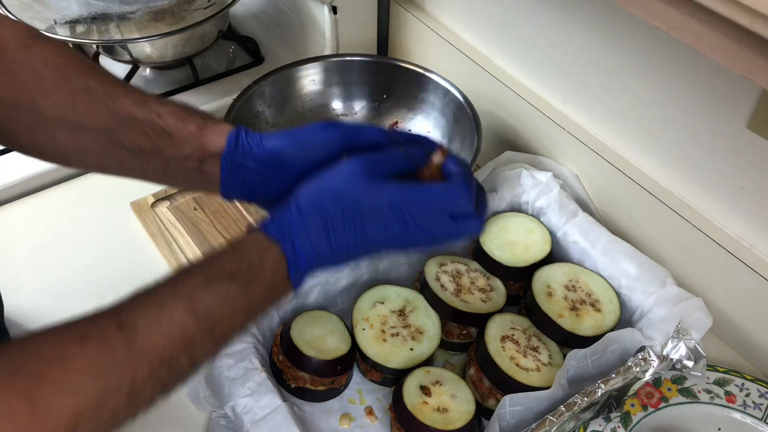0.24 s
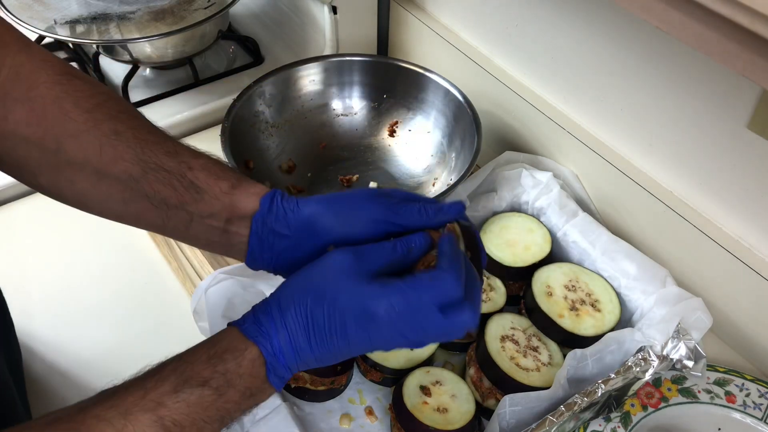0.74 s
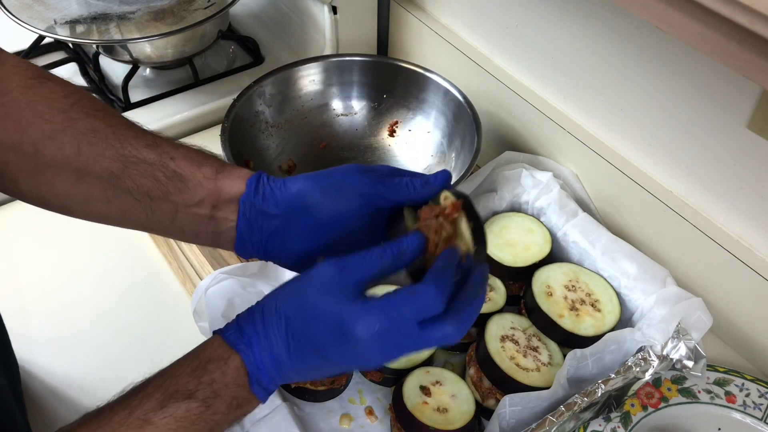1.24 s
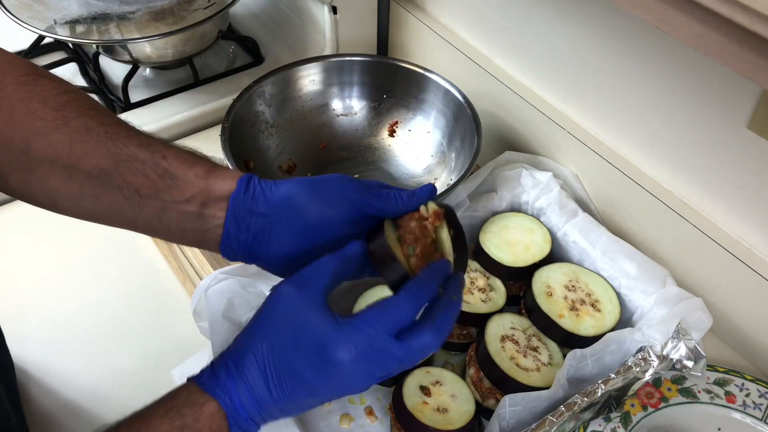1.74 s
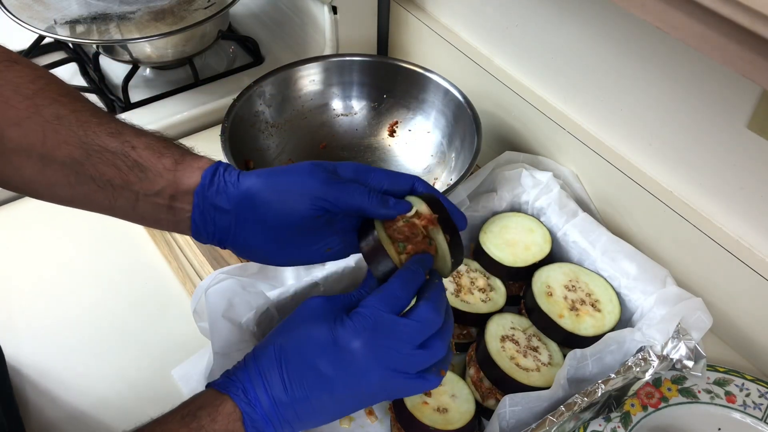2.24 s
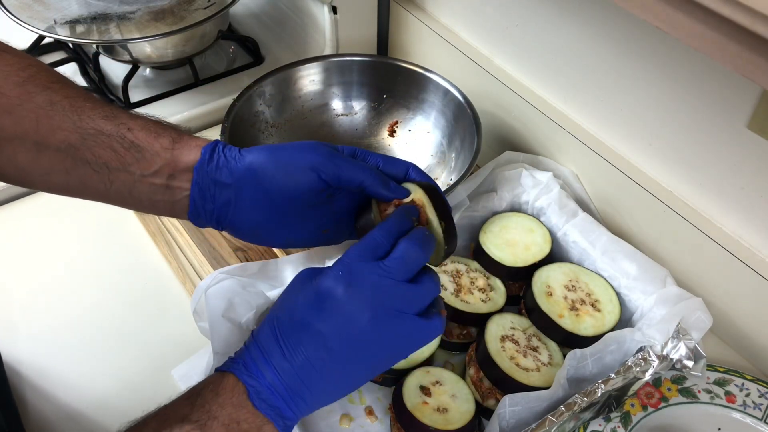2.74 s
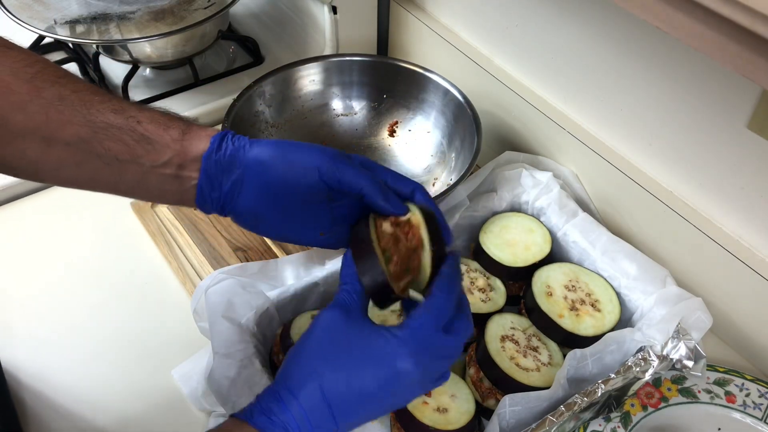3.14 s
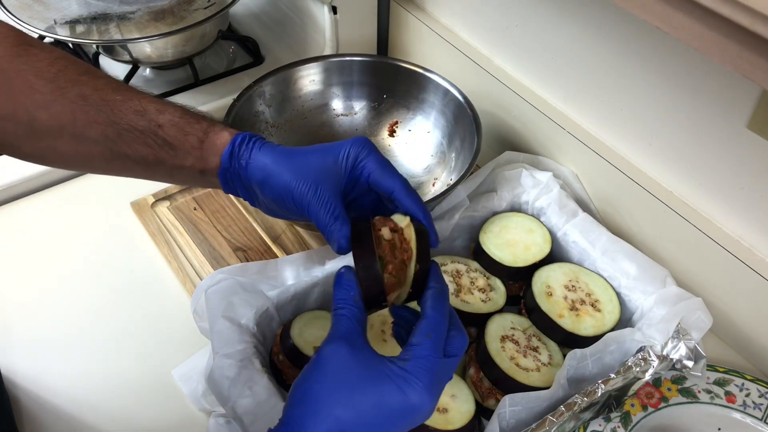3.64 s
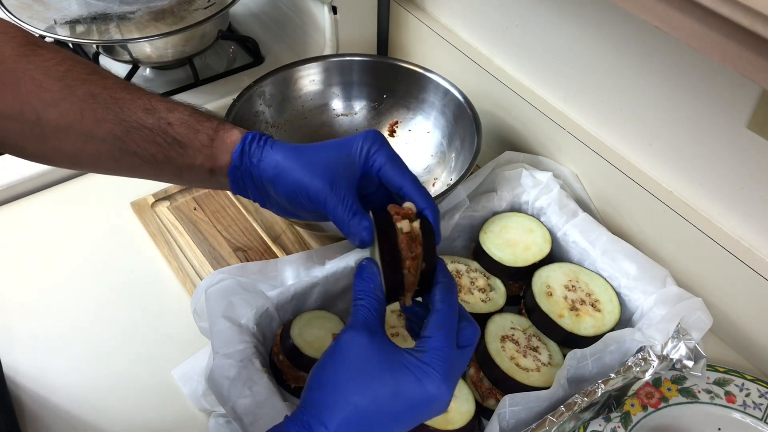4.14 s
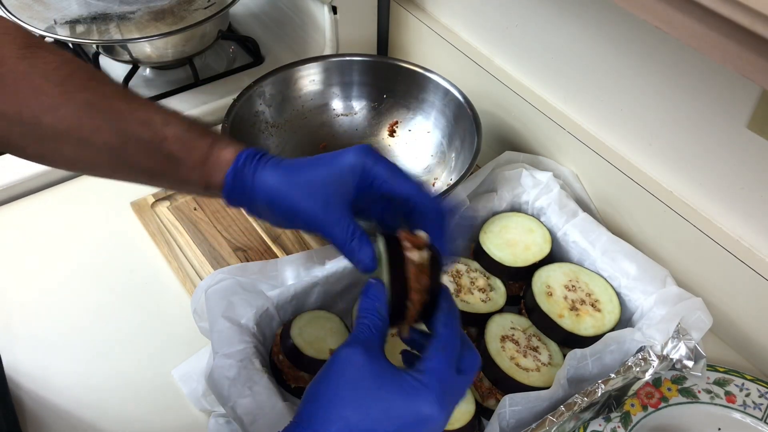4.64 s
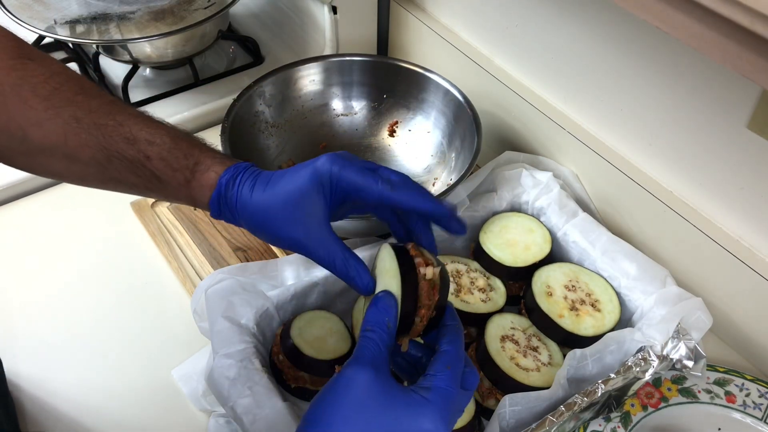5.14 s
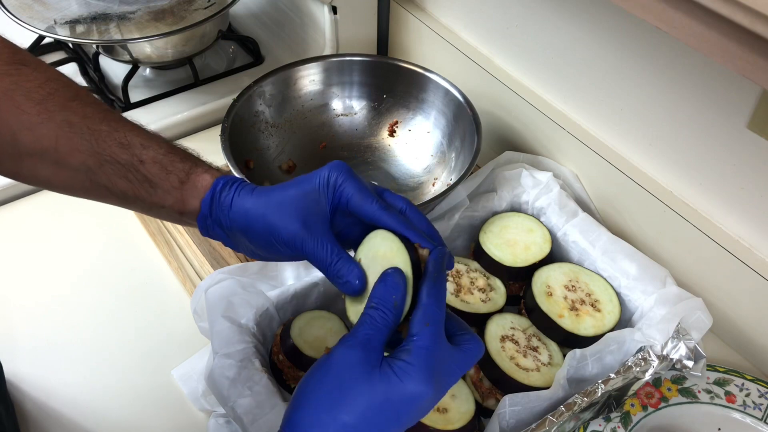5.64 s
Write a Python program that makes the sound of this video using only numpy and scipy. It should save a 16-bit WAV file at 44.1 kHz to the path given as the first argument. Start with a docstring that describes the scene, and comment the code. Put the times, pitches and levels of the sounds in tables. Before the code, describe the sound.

Faint wet crackle and glove rubs in a quiet humming kitchen, with crisp rubber snaps near one and a half and five seconds.

```python
"""A low appliance hum in a quiet, hard-walled kitchen: steady tones that waver, over rumble and hiss.
Gloved hands press meat filling between two eggplant slices. Filtered grains of noise make the
moist crackle and the rubs, short rings the wet pops, short noise bursts the rubber ticks.
Foremost, sticky gloves snap as they pull free: evenly flattened noise, shaped by resonances,
arrives direct and is answered by the walls."""
import sys
import numpy as np
from scipy import signal
from scipy.fft import rfft, irfft
from scipy.io import wavfile
from scipy.ndimage import uniform_filter1d

SR = 44100
rng = np.random.default_rng(int(sys.argv[2]) if len(sys.argv) > 2 else 0)


def dump(signal):
    """Clip the signal to [-1, 1] and save it as 16-bit WAV at the path in sys.argv[1]."""
    limited = np.clip(np.atleast_2d(signal).T, -1, 1)
    pcm = np.round(limited * 32767).astype(np.int16)
    wavfile.write(sys.argv[1], SR, pcm)


N = 260073
TIME = np.arange(N) / SR
CUTOFF_HZ = 16000   # top of the microphone's range


def from_db(db):
    """Decibels to amplitude gain."""
    return 10 ** (np.asarray(db) / 20)


def rms_one(x):
    """Scale to rms 1."""
    return x / np.sqrt(np.mean(x ** 2) + 1e-20)


def unit_energy(x):
    """Scale to the energy of a unit click."""
    return x / np.sqrt(np.sum(x ** 2))


def at_hz(points, hz):
    """Read (f/Hz, value) points on a log-frequency axis."""
    f, value = np.transpose(points)
    return np.interp(np.log(hz + 1e-3), np.log(f), value)


def hz_axis(size):
    """Frequencies of the bins of a transform."""
    return np.arange(size // 2 + 1) * SR / size


def add(track, s, sound):
    """Mix a sound in at a time in seconds."""
    start = max(round(s * SR), 0)
    track[start:start + len(sound)] += sound[:N - start]


def drift(rate_hz):
    """Slow random wander of rms 1: noise with a Gaussian low-pass."""
    lowpass = np.exp(-(hz_axis(N) / rate_hz) ** 2)
    return rms_one(irfft(rfft(rng.standard_normal(N)) * lowpass, N))


def coloured(x, spectrum):
    """Give a steady sound a spectrum; rms 1."""
    gain = from_db(at_hz(spectrum, hz_axis(N)))
    return rms_one(irfft(rfft(x) * gain, N))


def band(x, hz, octaves, order=1):
    """Band-pass around a centre."""
    low = hz * 2 ** (-octaves / 2)
    high = min(hz * 2 ** (octaves / 2), .45 * SR)
    return signal.sosfilt(signal.butter(order, [low, high], "band", fs=SR, output="sos"), x)


def causal(gain_db):
    """Minimum-phase response with the given gains: nothing sounds early."""
    cepstrum = irfft(np.log(from_db(gain_db)))
    half = len(cepstrum) // 2
    cepstrum[1:half] *= 2
    cepstrum[half + 1:] = 0
    return np.exp(rfft(cepstrum))


def bump(f, hz, width_hz, db):
    """A resonance as a gain in dB."""
    return db / (1 + (2 * (f - hz) / width_hz) ** 2)


def grains(per_s, spread_db):
    """Tiny slips of uneven size at random moments; rms 1."""
    sizes = from_db(spread_db * np.minimum(rng.exponential(1, N), 5))
    happens = rng.random(N) < per_s / SR
    return rms_one(sizes * rng.standard_normal(N) * happens)


def flutter(rise, t60, size=8192, count=3, abruptness=1.137):
    """Rubber slapping to rest: a dense train of contacts that holds all pitches evenly, then breaks off."""
    t = np.arange(size) / SR
    envelope = (1 - np.exp(-t / rise)) * from_db(-60 * np.minimum(t / t60, 2) ** abruptness)
    x = rng.standard_normal(size) * envelope
    # by turns flatten the spectrum and restore the envelope
    for _ in range(count):
        even = irfft(np.exp(1j * np.angle(rfft(x))))
        local_power = uniform_filter1d(even ** 2, size=48)
        x = even * envelope / np.sqrt(np.abs(local_power) + 1e-12)
    return unit_energy(x)


# appliance tones before waver and swell: (f/Hz, rms level/dB)
HUM_TONES = [(59.5, -69.5), (118.5, -70.5), (220, -77.5)]
# spectrum of the kitchen's rumble and hiss: (f/Hz, relative level/dB per Hz)
AIR_SPECTRUM = [(20, -60.5), (30, -39.5), (45, 1.5), (87, -1), (120, -1.5), (155, -15), (211, -5.5),
                (290, -13.5), (460, -19.5), (1000, -19.5), (2000, -23.5), (4300, -35), (10000, -37.5),
                (16000, -35.5)]
AIR_RMS_DB = -60
# the hum swells once, slowly
HUM_SWELL_AT_S, HUM_SWELL_HALF_S, HUM_SWELL_DB = 3.55, 0.51, 5.5


def background(waver=0.37):
    """Room rumble and hiss as coloured noise under sines that waver in level and phase."""
    hum = np.zeros(N)
    for hz, db in HUM_TONES:
        level = from_db(db) * (1 + waver * drift(1.7))
        phase = 2 * np.pi * hz * TIME + 2 * waver * drift(2.2)
        hum += level * np.sqrt(2) * np.sin(phase)
    swell_db = HUM_SWELL_DB * np.exp(-.5 * ((TIME - HUM_SWELL_AT_S) / HUM_SWELL_HALF_S) ** 2)
    air = from_db(AIR_RMS_DB) * coloured(rng.standard_normal(N), AIR_SPECTRUM)
    return hum * from_db(swell_db) + air


# decay of the kitchen's late tail: (f/Hz, t60/s)
KITCHEN_DECAY = [(200, 0.84), (700, 0.426), (2500, 0.303), (6000, 0.26), (10000, 0.26), (15000, 0.071)]


def kitchen_response(early_db=10.5, early_t60=0.0463, gap_s=0.0012, size=32768):
    """Quick reflections from counter and wall, then a tail that dies sooner in the treble."""
    t, out = np.arange(size) / SR, 0
    for hz in np.geomspace(140, 16000, num=14):
        tail = from_db(-60 * t / at_hz(KITCHEN_DECAY, hz))
        early = from_db(early_db - 60 * t / early_t60)
        out = out + band(rng.standard_normal(size), hz, 0.522, order=2) * (tail + early)
    response = rfft(out * (1 - np.exp(-(t / gap_s) ** 2)))
    # hard walls return all pitches about equally
    power = uniform_filter1d(np.abs(response) ** 2, size=90)
    return unit_energy(irfft(response * causal(-10 * np.log10(power + power.mean() / 20))))


def in_kitchen(x, room, room_db):
    """Direct sound at the microphone plus the room's answer."""
    return x + from_db(room_db) * signal.fftconvolve(x, room)[:len(x)]


# the fingers press the filling: (t/s at the firmest, rustle level/dB)
FINGER_PRESSES = [(0.58, -66), (1.08, -70), (1.36, -68.5), (2.4, -78.5), (3.1, -70), (3.46, -79.5),
                  (5.25, -72.5), (5.85, -70)]
PRESS_ATTACK_S, PRESS_RELAX_S = .11, 0.277   # time constants
# the gloves rustle a little even while they only hold, less as the filling settles
HOLD_DB, HOLD_FADE_DB_PER_S = -71.5, 1.2353


def effort():
    """Finger work as a gain: low while holding, swelling with each press, dying as the filling gives way."""
    power = from_db(HOLD_DB - HOLD_FADE_DB_PER_S * TIME) ** 2
    for s, db in FINGER_PRESSES:
        press = np.exp(-np.maximum((s - TIME) / PRESS_ATTACK_S, (TIME - s) / PRESS_RELAX_S))
        power = power + (from_db(db) * press) ** 2
    return np.sqrt(power)


# spectrum of the moist rustle: (f/Hz, relative level/dB per Hz)
RUSTLE_SPECTRUM = [(200, -31.5), (800, -18.5), (1500, 0.5), (3200, -.5), (6000, -1), (9300, -2),
                   (10500, -9.5), (12000, 1.5), (16000, -10)]


def kneading(work, patchy_db=2.5):
    """Fine moist crackle: coloured random grains that follow the work of the fingers."""
    crackle = coloured(grains(per_s=2800, spread_db=0.84), RUSTLE_SPECTRUM)
    return work * from_db(patchy_db * drift(22)) * crackle


def stroke(s, db, half_length):
    """A sliding finger speeds up and slows down evenly: a Gaussian gain."""
    return from_db(db) * np.exp(-.5 * ((TIME - s) / half_length) ** 2)


# glove glides over the smooth skin with a broad hiss: (t/s at the middle, rms level/dB, half length/s)
SKIN_GLIDES = [(1.873, -61, 0.0155), (2.375, -59.5, 0.011), (2.883, -61.5, 0.0184), (2.933, -61.5, 0.0103),
               (3.26, -66, 0.0256), (3.796, -68, 0.026), (4.407, -63.5, 0.0103), (4.627, -64.5, 0.0316),
               (5.229, -63.5, 0.026), (5.729, -57.5, 0.0181)]
GLIDE_HZ, GLIDE_OCTAVES = 9870, 3.26
# glove grips and nearly squeaks, always at one pitch: (t/s at the middle, rms level/dB, half length/s)
NEAR_SQUEAKS = [(0.611, -73, 0.037), (1.446, -66, 0.0236), (1.874, -62.5, 0.0121), (3.167, -70.5, 0.0167)]
SQUEAK_HZ, SQUEAK_OCTAVES = 3344, 0.242
# soft flesh drags dully: (t/s at the middle, rms level/dB, half length/s, centre f/Hz)
FLESH_DRAGS = [(0.16, -68.5, 0.0218, 1514), (1.032, -70.5, 0.025, 1196), (2.215, -67.5, 0.0228, 970),
               (2.903, -73, 0.086, 680), (3.278, -66.5, 0.0196, 517), (3.578, -71.5, 0.104, 565),
               (3.75, -63.5, 0.042, 577), (3.869, -65, 0.0323, 540), (5.848, -68, 0.033, 1320)]
DRAG_OCTAVES = 0.822


def rubs(stutter_db=1.7):
    """Glove slides on eggplant: dense slips, broad in a glide, narrow near a squeak, dull on the flesh."""
    slips = grains(per_s=16000, spread_db=3.5) * from_db(stutter_db * drift(90))
    hiss = rms_one(band(slips, GLIDE_HZ, GLIDE_OCTAVES, order=2))
    glides = sum(stroke(*row) for row in SKIN_GLIDES) * hiss
    narrow = rms_one(band(slips, SQUEAK_HZ, SQUEAK_OCTAVES, order=2))
    squeaks = sum(stroke(*row) for row in NEAR_SQUEAKS) * narrow
    drags = np.zeros(N)
    for s, db, half_length, hz in FLESH_DRAGS:
        dull = rms_one(band(slips, hz, DRAG_OCTAVES, order=2))
        drags += stroke(s, db, half_length) * dull
    return glides + squeaks + drags


# wet pops of the filling: (t/s, level/dB before trim and splat, f/Hz)
WET_POPS = [(1.4748, -46, 3300), (1.675, -43.5, 1207), (2.891, -47, 4050), (3.081, -48, 2445),
            (3.1855, -44, 3157), (3.247, -53, 2053), (3.260, -45, 1091), (3.274, -53, 960),
            (3.324, -51, 929)]
POP_CYCLES = 59.6   # each ring falls 60 dB within this many cycles


def pops(trim_db=-3.0, swell_s=0.000243, spread=0.059, splat_db=-6.0, splat_octaves=2.34,
         splat_share=0.56, count=4, size=8192):
    """Wet pockets open with a splat and ring at close, unequal pitches; the lower, the longer."""
    out, t = np.zeros(N), np.arange(size) / SR
    for s, db, hz in WET_POPS:
        t60 = POP_CYCLES / hz
        pitches = hz * (1 + spread * (np.linspace(-1, 1, count) + rng.random(count) - .5))
        ring = np.sin(2 * np.pi * np.outer(pitches, t)).sum(axis=0)
        ring = ring * (1 - np.exp(-t / swell_s)) * from_db(-60 * t / t60)
        splat = band(flutter(swell_s, splat_share * t60, size=size), hz, splat_octaves, order=2)
        pop = ring / np.abs(ring).max() + from_db(splat_db) * splat / np.abs(splat).max()
        add(out, s, from_db(db + trim_db) * pop)
    return out


# fainter ticks come by chance, as often as the fingers press hard: rate at the firmest press,
# middle level before trim, middle pitch
STRAY_TICKS_PER_S, STRAY_TICK_DB, STRAY_TICK_HZ = 24, -51.5, 9000


def stray_ticks(work, scatter_db=-5.0, scatter_octaves=.75, count=240):
    """Chance ticks (t/s, level/dB before trim, f/Hz) that crowd where the fingers work hardest."""
    when, luck, strength, pitch = rng.random((count, 4)).T
    per_s = STRAY_TICKS_PER_S * (work[(when * N).astype(int)] / work.max()) ** 2
    db = STRAY_TICK_DB + scatter_db * (2 * strength - 1)
    hz = STRAY_TICK_HZ * 2 ** (scatter_octaves * (2 * pitch - 1))
    rows = np.column_stack([when * N / SR, db, hz])
    # keep each candidate with the chance that gives the wanted rate
    return list(rows[luck < per_s * N / SR / count])


# tacky ticks of rubber: (t/s, peak level/dB before trim, centre f/Hz)
CLEAR_TICKS = [(1.004, -44, 7150), (1.085, -43, 5030), (1.3175, -48, 5300), (2.172, -42, 11500),
               (2.6843, -50.5, 5840), (4.5295, -47.5, 7200), (4.608, -43, 4410), (4.6489, -41, 7670)]


def ticks(work, trim_db=-2.5, t60=0.0104, octaves=1.53):
    """Tacky rubber unsticks at a single spot: a few clear ticks among faint stray ones."""
    out = np.zeros(N)
    for s, db, hz in CLEAR_TICKS + stray_ticks(work):
        tick = band(flutter(t60 / 20, t60), min(hz, CUTOFF_HZ), octaves, order=2)
        add(out, s, from_db(db + trim_db) * tick / np.abs(tick).max())
    return out


# glove snaps: (t/s, direct level/dB of a unit click's energy, rise/s, t60/s, room level/dB re direct,
# bass/dB, mid/dB, treble/dB, air/dB, resonances [(f/Hz, level/dB)])
GLOVE_SNAPS = [(0.4576, -16.5, 0.000258, 0.0352, 0.48, -0.5, 2.5, -7, -9.5, [(1530, 7), (1860, 8),
               (3150, 10), (4800, 10), (8600, 11)]),
               (1.4987, -0.5, 0.000505, 0.0317, 0.082, -14.5, -1.5, -1.5, -10, [(650, 7.5), (1200, 7.5),
               (2030, 7), (2550, 11.5), (3800, 8.5), (4550, 8.5), (5800, 10.5), (11300, 10)]),
               (1.6275, -25, 0.000276, 0.0202, 1, 7, 1, -8, -12, [(1200, 20.5), (2550, 19.5)]),
               (4.7738, -4.5, 0.00313, 0.0276, 1, -15.5, -5, -5.5, -12, [(630, 4), (840, 8.5), (1870, 3.5),
               (2450, 3), (3100, 1), (3650, 2.5), (4450, -2)]),
               (4.9216, -21.5, 0.00192, 0.0333, 1, 1.5, 2.5, -13.5, -30, [(520, 10.5), (1140, 9),
               (2560, 10.5)]), (5.0644, -1, 0.000374, 0.00448, -0.16, -8.5, -1.5, 1, 1, [(425, 17.5),
               (620, 9.5), (1480, 13), (2500, 10), (3100, 15), (6000, 10.5), (6900, 10.5), (9300, 17.5)])]
# where the colour is set: bass, mid, reference at 0 dB, treble, air (f/Hz)
SNAP_COLOUR_HZ = [300, 1200, 3500, 8000, 14000]
# low resonance of the counter corner: (f/Hz, width/Hz, level/dB)
COUNTER_CORNER = (226.7, 87.5, 8.8)


def snaps(relative_width=0.095, low_cut_hz=150, room_share=0.345, size=8192):
    """Stretched glove lets go and slaps back; each patch of rubber has its own colour and resonances."""
    out, f = np.zeros(N), hz_axis(size)
    for s, db, rise, t60, room_db, bass, mid, treble, air, resonances in GLOVE_SNAPS:
        colour = at_hz(list(zip(SNAP_COLOUR_HZ, [bass, mid, 0, treble, air])), f)
        colour += bump(f, *COUNTER_CORNER)
        colour -= 10 * np.log10(1 + (low_cut_hz / (f + 10)) ** 4)   # low cut
        peaks = sum(bump(f, hz, relative_width * hz, peak_db) for hz, peak_db in resonances)
        slap = rfft(flutter(rise, t60))
        direct = unit_energy(irfft(slap * causal(colour + peaks)))
        # the room gathers sound from all sides of the glove, which evens out the peaks
        all_round = unit_energy(irfft(slap * causal(colour + room_share * peaks)))
        add(out, s, from_db(db) * direct)
        # the hands move, so each snap meets its own pattern of reflections
        answer = signal.fftconvolve(all_round, kitchen_response())
        add(out, s, from_db(db + room_db) * answer)
    return out


def scene():
    """Background, then the fingers' small sounds in the kitchen, then the snaps with their own answers."""
    work = effort()
    handling = kneading(work) + rubs() + pops() + ticks(work)
    fingers = in_kitchen(handling, kitchen_response(), room_db=-5.0)
    return (background() + fingers + snaps())[None]


def record(dry):
    """The microphone's top is cut steeply by an elliptic low-pass."""
    return signal.sosfilt(signal.ellip(10, .2, 80, CUTOFF_HZ, fs=SR, output="sos"), dry)


dry = scene()
out = record(dry)
dump(out)
```